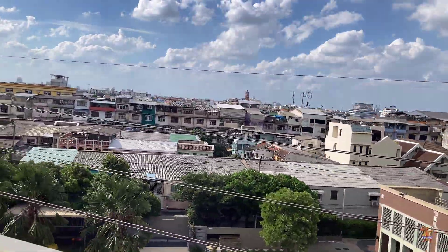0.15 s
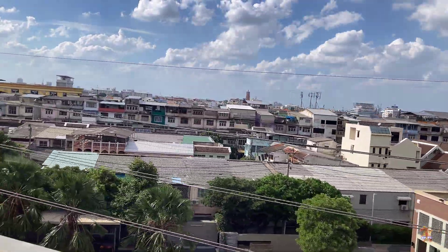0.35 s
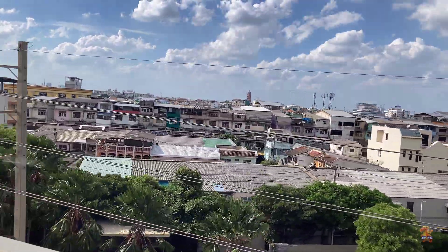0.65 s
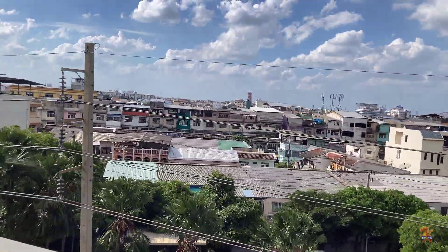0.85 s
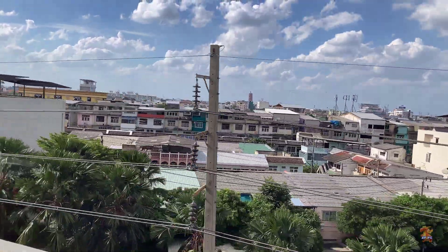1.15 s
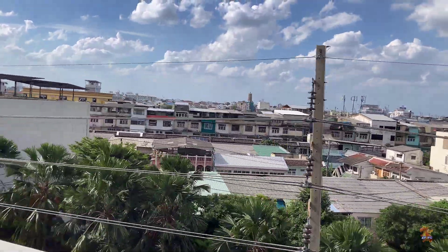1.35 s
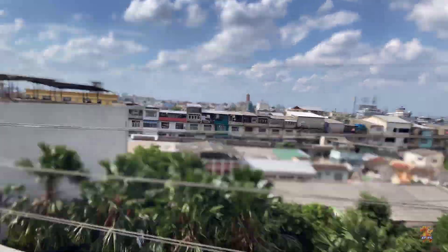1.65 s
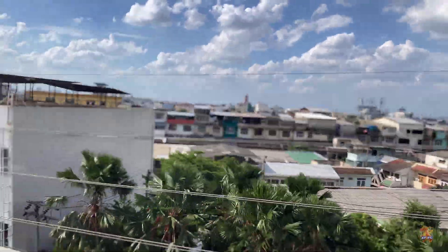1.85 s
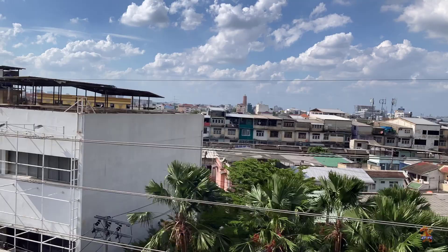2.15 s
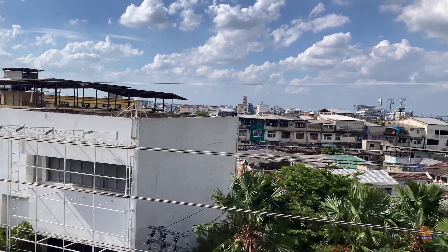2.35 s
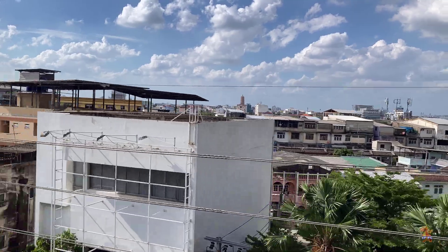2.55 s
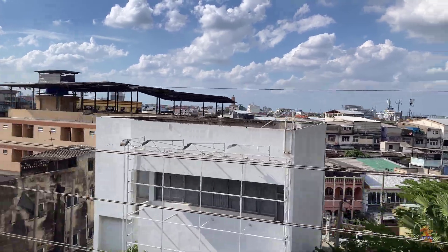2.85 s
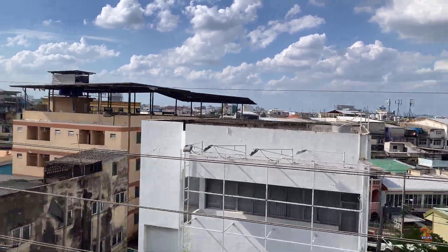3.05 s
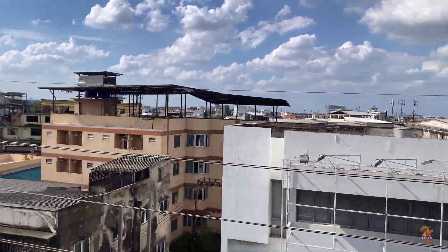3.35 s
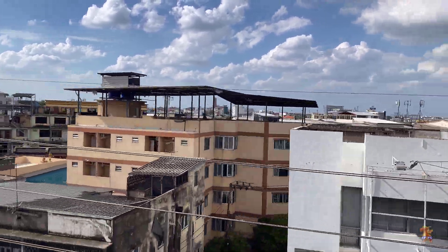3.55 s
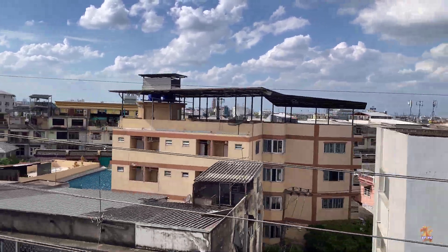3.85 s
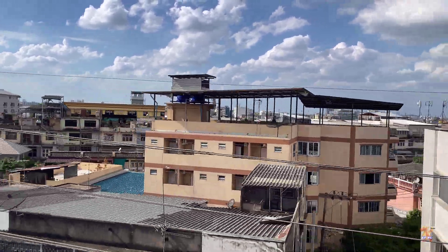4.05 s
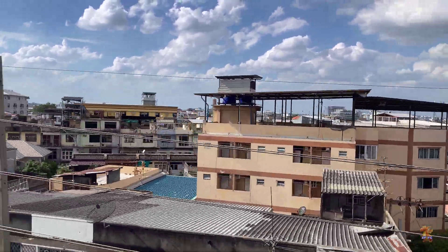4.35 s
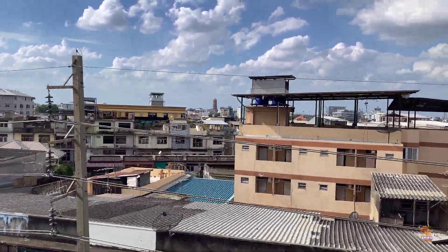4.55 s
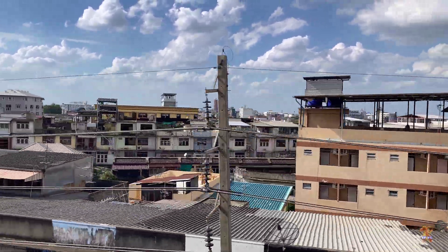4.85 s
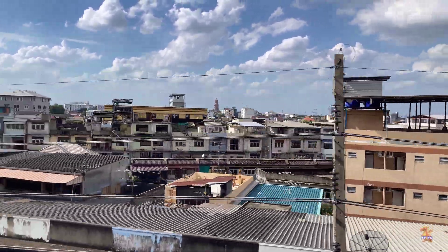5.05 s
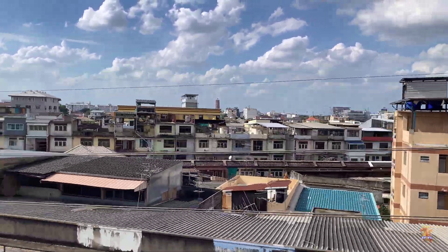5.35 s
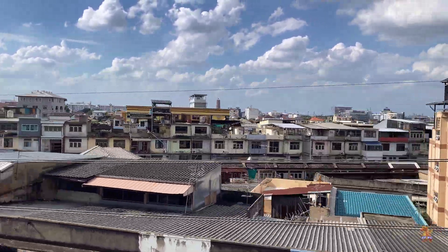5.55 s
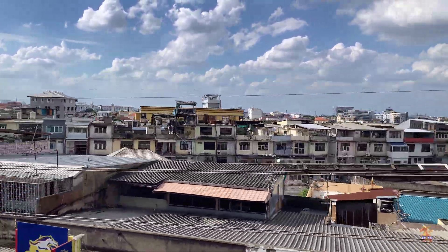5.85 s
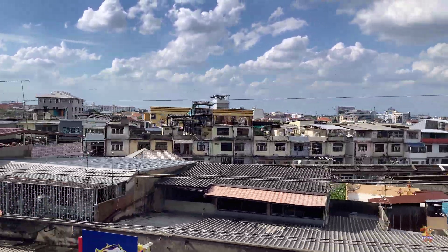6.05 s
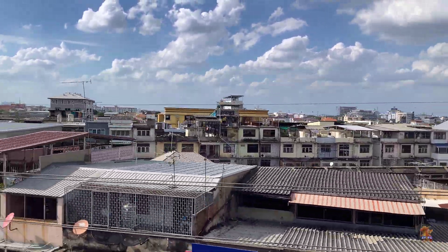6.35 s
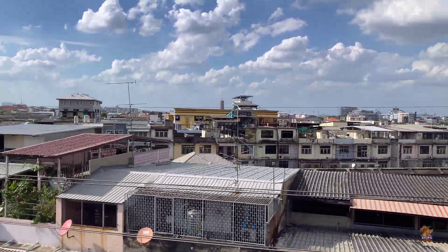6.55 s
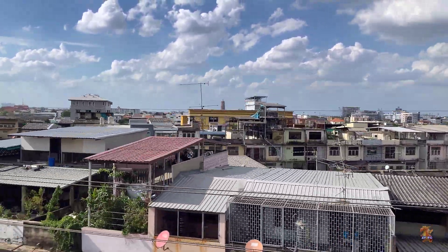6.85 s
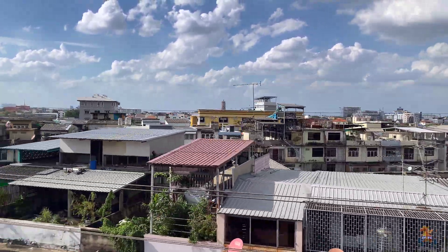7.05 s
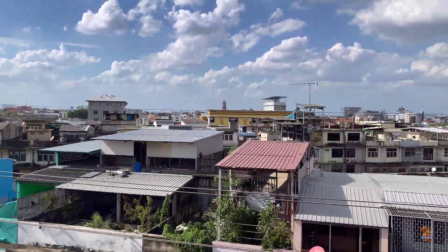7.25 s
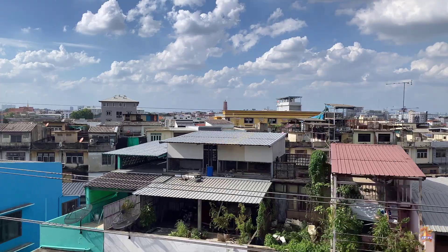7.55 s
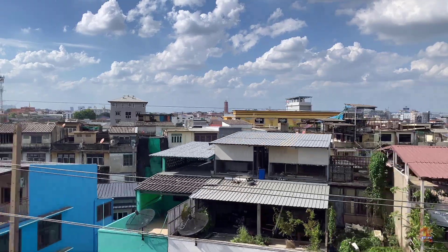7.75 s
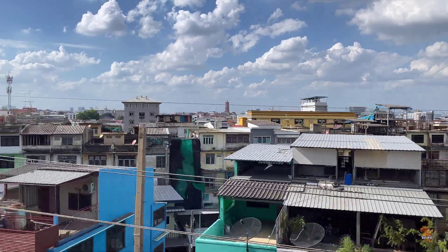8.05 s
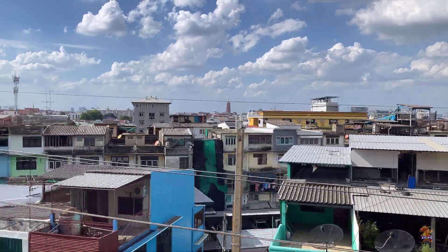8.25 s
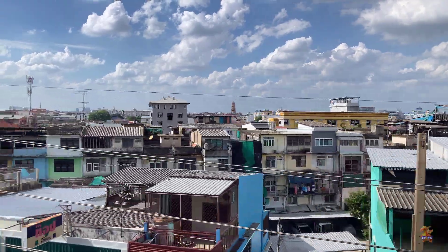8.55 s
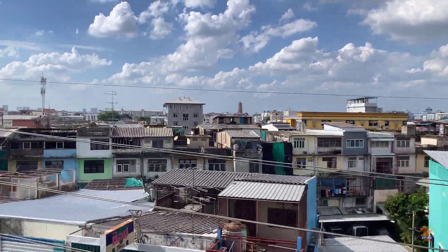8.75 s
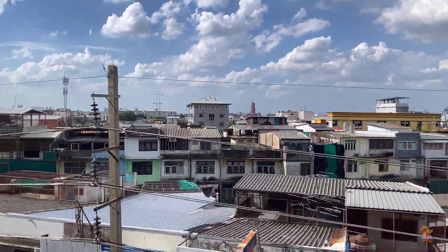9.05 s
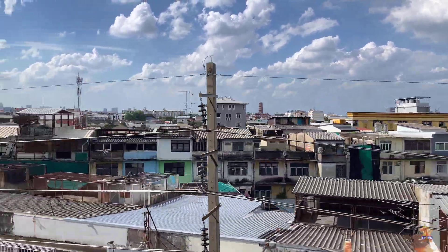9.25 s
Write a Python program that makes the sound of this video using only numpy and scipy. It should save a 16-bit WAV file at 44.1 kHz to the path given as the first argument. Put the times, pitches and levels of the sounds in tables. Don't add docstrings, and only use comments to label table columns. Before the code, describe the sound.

Interior of an elevated train running at steady speed for about 9.4 seconds. A deep, thick floor rumble dominates, strongest in the bass, over a low deck drone and body hum; wheel roar and thin air hiss are much quieter. The level swells and dips gently, with a firmer surge around 6.2-6.7 s and a more hollow drone until about 8.4 s. A steady compressor hum pulses underneath. A faint, slightly wavering gear whine comes in short patches at 0-1.3 s, fades, returns from 3.8 to 5.7 s, and again after 7.9 s; a lower tone joins at 3-4.5 s. Tiny bright panel ticks scatter throughout. At 1.7 s a hand bumps the camera: dull thump, sharp snap, small creaks. Soft body knocks follow around 3.2, 5-5.4, 6.35 and 7.6 s, with tiny squeaks near 3, 7 and 9.3 s. Close stereo microphones, bass centred.

```python
import sys
import numpy as np
from scipy import signal
from scipy.fft import rfft, irfft, next_fast_len
from scipy.io import wavfile
from scipy.ndimage import uniform_filter1d

SR = 44100
rng = np.random.default_rng(int(sys.argv[2]) if len(sys.argv) > 2 else 0)


def wrap_up_sound(samples):
    columns = np.atleast_2d(samples).T
    tamed = np.clip(columns, -1, 1)
    steps = np.round(tamed * 32767).astype(np.int16)
    wavfile.write(sys.argv[1], SR, steps)


def how_loud(loudness_db):
    steps = np.asarray(loudness_db, float) / 20
    return 10 ** steps


N = 414099

# (time [s], level [dB])
RIDE = [(0.0, -17.5), (0.73, -21), (3.3, -18.5), (3.55, -21), (3.9, -19), (6.2, -20.5), (6.22, -15.5),
        (6.75, -20.5), (6.93, -18), (7.19, -20), (7.61, -18), (7.93, -20), (8.11, -19), (8.24, -21),
        (8.89, -19), (9.23, -25), (9.36, -19), (9.39, -30.5)]
# (frequency [Hz], density [dB per Hz])
RUMBLE = [(22, -39), (32, -34), (38, -12), (45, -9), (62, 1.5), (85, -1.5), (100, -6.5), (160, -11),
          (210, -47), (350, -120)]
DRONE = [(50, -100), (90, -11), (120, -0.5), (160, -2.5), (205, -7.5), (240, -17), (300, -29.5),
         (600, -120)]
BODY = [(100, -100), (200, -17), (240, 0), (340, -0.5), (370, -3.5), (410, -8), (480, -9.5), (700, -14),
        (800, -25), (1500, -100)]
ROAR = [(350, -100), (650, -56), (780, 1.5), (950, -2.5), (1050, -1), (1400, -6), (2300, -12), (3200, -46),
        (6000, -110)]
HISS = [(800, -100), (1900, -45), (2500, 1), (4500, -5.5), (6300, -10.5), (7900, -15), (8800, -14),
        (12000, -19.5), (14000, -21.5), (15700, -15.5), (17000, -32)]
RUMBLE_DB, DRONE_DB, BODY_DB, ROAR_DB, HISS_DB = -19.5, -25.5, -31, -41, -49
RUMBLE_SHARE, DRONE_SHARE, BODY_SHARE, ROAR_SHARE = 1.57, 0.92, 0.67, 0.12
# (start [s], length [s], lift [dB])
SPANS = [
    (6.25, 2.14, 2.5),
    (2.5, 0.44, 4),
    (0.25, 0.33, -1),
    (9.6, 0.36, 1),
]
# (time [s], lift [dB])
JOINTS = [
    (0.02, 0.5),
    (1.72, 0.5),
    (3.05, 2),
    (4.73, 1),
    (6.36, 1.5),
    (9.3, 0),
]
JOINT_S = 0.075

# (time [s], level of the fourth order [dB])
COMPRESSOR_LOAD = [(0.0, -33), (0.21, -25.5), (0.68, -26), (0.73, -34), (1.49, -25.5), (1.75, -45),
                   (1.8, -32.5), (4.68, -28), (5.68, -32.5), (5.73, -25), (6.17, -50.5), (6.49, -26.5),
                   (7.29, -33), (7.37, -26.5), (9.26, -34), (9.39, -70)]
# (multiple of the shaft [1], level re the mean fourth order [dB])
HUM_ORDERS = [(1, 3), (3, -3), (6, -8.5), (16, -26.5)]
SHAFT_HZ = 47.95
SAG_S, SAG_DB = 3.3, 4.0

# (time [s], pitch [Hz])
WHINE_HZ = [(0, 832), (.3, 843), (.6, 847), (1.4, 849.5), (2.2, 842), (3.6, 835), (4.6, 839), (5.2, 846),
            (5.8, 850.5), (6.5, 843), (8.2, 838.5), (8.9, 837), (9.39, 847.5)]
# (start [s], length [s], level [dB])
WHINE = [(0.063, 0.24, -47), (0.29, 0.35, -44.5), (0.65, 0.22, -46), (0.945, .14, -46),
         (1.147, 0.15, -48.5), (1.36, .12, -59), (1.848, 0.31, -64), (3.45, 0.2, -67), (3.8, 0.11, -54),
         (3.947, 0.41, -50.5), (4.453, 0.39, -48.5), (4.854, 0.37, -45), (5.296, 0.4, -44),
         (5.745, 0.035, -57), (7.917, 0.15, -57), (8.18, 0.14, -53), (8.4, 0.23, -57), (8.746, 0.3, -50),
         (9.09, .4, -45)]
# (start [s], length [s], level [dB])
WHINE_LOW = [
    (.55, 0.34, -59),
    (3.065, 0.21, -47.5),
    (3.32, 0.09, -51),
    (3.454, .1, -45),
    (3.632, 0.89, -53),
]
# (start [s], length [s], level [dB])
WHINE_HIGH = [
    (-.1, .45, -57),
    (1.4, .31, -51),
    (4.7, .03, -52),
    (5.95, .3, -57),
    (7.94, .08, -51),
    (8.1, .1, -54),
]
# (time [s], share of SLACK [1])
MESH = [(0, 1.1), (1.0, 1.1), (1.2, .6), (5.25, 1.2), (5.4, .3), (5.8, .3), (8.8, 1.1), (9.39, 1.1)]
SLACK = .17
SWELL_S, FADE_S, IDLE_DB = 0.029, 0.057, -58.5

# (time [s], peak level [dB], ring [Hz])
TICKS = [(0.0737, -32, 7300), (0.2748, -32.5, 7260), (0.5477, -40, 7060), (1.3583, -38, 7140),
         (1.6841, -34.5, 7140), (2.2074, -38, 6360), (2.3625, -31.5, 7190), (3.2226, -34.5, 7500),
         (3.8511, -36, 6890), (3.9484, -35.5, 7120), (4.8698, -35.5, 7070), (4.9222, -35, 7220),
         (5.2884, -35, 7550), (5.9609, -42, 7050), (6.1988, -36, 6770), (6.3984, -36, 7190),
         (6.9336, -34, 7000), (7.083, -32, 6800), (7.4656, -33, 6870), (7.7288, -39, 6890),
         (7.9319, -37, 6400), (8.3884, -36, 7010), (8.4257, -38, 7540), (8.5245, -39, 6700),
         (8.6393, -35.5, 7500), (8.7291, -37, 7200), (8.8348, -36, 6800), (8.9275, -33.5, 6570),
         (8.9755, -44, 7080), (9.1491, -40, 7430)]
RING, FAINT_DB, FAINT_SPREAD_DB, PANEL_HZ = 0.26, -51, 5, 6800

# (time [s], length [s], frequency [Hz], width
# [Hz], level [dB])
SQUEAKS = [(2.913, .03, 2560, 200, -50), (3.031, 0.019, 2400, 200, -47), (4.73, 0.097, 3160, 300, -53),
           (5.85, .12, 9000, 500, -61), (6.954, .05, 3000, 250, -46.5), (9.292, 0.035, 2100, 120, -43),
           (9.298, 0.03, 2860, 230, -49), (9.318, 0.05, 2560, 100, -52), (9.355, 0.035, 2000, 120, -44),
           (9.265, 0.024, 1080, 100, -45), (1.715, .012, 6500, 6000, -46), (1.755, .07, 9500, 6000, -60),
           (1.75, .08, 13500, 2500, -64), (8.965, .03, 11000, 8000, -60), (9.14, .025, 11000, 8000, -61),
           (6.62, .05, 510, 40, -40.5), (7.58, .05, 430, 40, -36), (8.98, .025, 1250, 120, -41),
           (9.06, .025, 1120, 120, -43)]
# (time [s], peak level [dB], frequency [Hz], time to -60 dB [s])
BUMP = [
    (1.7165, -27, 520, .02),
    (1.7212, 11, 200, .008),
    (1.7245, -22, 290, .06),
    (1.724, -4, 76, .09),
    (1.7348, -34, 2750, .014),
]
# (time [s], peak level [dB])
CREAKS = [
    (1.723, -29),
    (1.7347, -15.5),
    (1.762, -35),
    (1.775, -38),
    (1.7865, -36),
    (1.798, -32),
    (8.976, -31),
    (9.149, -33),
]
# (frequency [Hz], width [Hz], gain [dB])
CASE = [(2700, 1200, 0), (4800, 3000, -8), (7200, 2500, -9), (9000, 2000, -3), (11200, 2600, 8),
        (13500, 2500, 5), (14900, 1500, 1)]
# (time [s], peak level [dB], frequency [Hz], time to -60 dB [s])
KNOCKS = [(2.16, -31, 853, .1), (2.52, -31, 890, .08), (3.032, -31, 826, 0.12), (3.03, -26, 920, 0.16),
          (3.219, -18, 336.5, 0.18), (5.0, -19, 230, 0.12), (5.329, -18, 290, .08),
          (5.449, -20, 305, 0.071), (6.35, -19, 251, 0.12), (4.1, -28.5, 538, 0.15), (5.115, 2, 200, 0.01),
          (6.3, -47, 450, 0.18), (6.817, -26, 555, 0.045), (7.589, -15, 130, 0.046),
          (7.59, -26, 620, 0.027)]

# (frequency [Hz], likeness [0-1, clipped])
SAME = [(60, .975), (220, .985), (330, 0.67), (600, 0), (900, 0.48), (1800, 0.25), (2400, -0.4),
        (6200, 0.27), (7000, 0.8), (8500, 0.9), (10000, 4), (16000, 9)]
# (frequency [Hz], lead of the right [rad])
LEAD = [(0, -.15), (400, -.45), (850, -2.0), (1050, -3.3), (2000, -4.0), (3200, -9.0), (5600, -15.0),
        (7000, -12.57), (15900, 0.0)]
# (frequency [Hz], left over right [dB])
TILT = [(40, -1.7), (90, -1.6), (170, -.7), (350, -.9), (600, 3.2), (1100, 1.9), (2400, .8), (6000, .4),
        (10000, 0)]


def evened(x):
    return x / np.sqrt(np.mean(x ** 2) + 1e-20)


def read(points, hz):
    f, value = np.transpose(points)
    return np.interp(np.log(hz + 1), np.log(f + 1), value)


def curves(rows):
    s, *columns = np.transpose(rows)
    return [np.interp(np.arange(N) / SR, s, c) for c in columns]


def drift(rate_hz):
    knots = rng.standard_normal(400)
    return np.interp(np.arange(N) / SR * rate_hz, np.arange(400), knots)


def add(mix, s, sound):
    part = mix[round(s * SR):][:len(sound)]
    part += sound[:len(part)]


def resonate(x, hz, width):
    turn = np.exp(2j * np.pi * np.cumsum(hz * np.ones(len(x))) / SR)
    r = np.exp(-np.pi * width / SR)
    smooth = signal.lfilter([1 - r], [1, -r], x / turn + 1e-18)
    return 2 * (turn * smooth).real


def wash(shape, size, patchy_db, flicker_db, steady=0):
    frames, hz = N * 2 // size + 3, np.fft.rfftfreq(size, 1 / SR)
    a, b, c, d, patches = rng.standard_normal((frames, len(hz), 5)).T
    patches = evened(uniform_filter1d(uniform_filter1d(patches, 10, 0), 5, 1))
    flicker = evened(uniform_filter1d(rng.standard_normal(frames), 3))
    z = np.array([a + 1j * b, c + 1j * d])
    power = uniform_filter1d(abs(z) ** 2 / 2, size=6, axis=1)
    z /= uniform_filter1d(power, size=3, axis=2) ** steady
    z *= how_loud(read(shape, hz)[:, None] + patchy_db * patches + flicker_db * flicker)
    return evened(signal.istft(z, window="cosine", nperseg=size)[1][:, :N])


def carriage():
    ride_db, = curves(RIDE)
    ride_db = ride_db - ride_db.mean()
    t = np.arange(N) / SR
    span_db = sum(db * np.clip(np.minimum(t - s, s + length - t) / 0.035, 0, 1) for s, length, db in SPANS)
    joint_db = sum(db * np.exp(-((t - s) / JOINT_S) ** 2) for s, db in JOINTS)

    rumble = wash(RUMBLE, size=8192, patchy_db=1.0, flicker_db=1.2, steady=0.55)
    rumble *= how_loud(RUMBLE_DB + RUMBLE_SHARE * ride_db - 0.84 * span_db)
    drone = wash(DRONE, size=4096, patchy_db=0.72, flicker_db=-0.07, steady=0.29)
    drone *= how_loud(DRONE_DB + DRONE_SHARE * ride_db + span_db)
    body = wash(BODY, size=4096, patchy_db=1.3, flicker_db=-0.93)
    body *= how_loud(BODY_DB + BODY_SHARE * ride_db + joint_db)
    roar = wash(ROAR, size=2048, patchy_db=1.22, flicker_db=0.66, steady=0.08)
    roar *= how_loud(ROAR_DB + ROAR_SHARE * ride_db + 1.5 * joint_db)
    hiss = wash(HISS, size=1024, patchy_db=1.5, flicker_db=.5)
    hiss *= how_loud(HISS_DB + 0.5 * joint_db)
    return rumble + drone + body + roar + hiss


def compressor():
    load_db, = curves(COMPRESSOR_LOAD)
    t = np.arange(N) / SR
    turns = t * SHAFT_HZ
    out = how_loud(load_db + 3.0 * drift(10.0)) * np.cos(2 * np.pi * 4 * turns)
    for order, db in HUM_ORDERS:
        sag_db = SAG_DB * (order > 5) * np.clip(t - SAG_S, 0, 1)
        order_db = load_db.mean() + db + 2.0 * drift(4.6) - sag_db
        out += how_loud(order_db) * np.cos(2 * np.pi * (round(order) * turns + rng.random()))
    return np.sqrt(2) * out


def load_patches(rows):
    t = np.arange(0, N, 64) / SR
    gain = np.zeros(len(t))
    for s, length, db in rows:
        edge = np.minimum((t - s) / SWELL_S, (s + length - t) / FADE_S)
        gain += how_loud(db) * np.clip(edge + 1, 0, 1) ** 2
    return np.interp(np.arange(N) / SR, t, gain)


def whine(hz, rows, wobble, trim_db):
    turns = np.cumsum(hz * np.ones(N)) / SR + wobble * drift(38)
    flutter_db = 1.8 * drift(21) - 1.0 * drift(30) ** 2
    gain = (load_patches(rows) + how_loud(IDLE_DB)) * how_loud(flutter_db + trim_db)
    return gain * np.sqrt(2) * np.cos(2 * np.pi * turns)


def ticks():
    out, t = np.zeros(N), np.arange(1500) / SR
    when, size, pitch = rng.random((13, 3)).T
    faint_db = FAINT_DB + FAINT_SPREAD_DB * (size - .5)
    rows = TICKS + list(zip(when * N / SR, faint_db, PANEL_HZ * (.96 + .08 * pitch)))
    bright = signal.butter(2, [3500, 11500], "band", fs=SR, output="sos")
    puffs = signal.sosfilt(bright, rng.standard_normal((len(rows), 1500)))
    rise = np.minimum(t / .0015, 1)
    for (s, db, hz), puff in zip(rows, puffs):
        panel = np.sin(2 * np.pi * hz * t) * how_loud(-60 * t / .03)
        burst = (1 - RING) * 0.95 * puff * how_loud(-60 * t / 0.053) + RING * panel
        add(out, s, how_loud(db - 2.5) * rise * burst)
    return out


def squeaks():
    out = np.zeros(N)
    for s, length, hz, width, db in SQUEAKS:
        rub = resonate(rng.standard_normal(round(length * SR)), hz, width)
        add(out, s, how_loud(db) * evened(rub) * signal.windows.tukey(len(rub), .4))
    return out


def blows(rows):
    out, t = np.zeros(N), np.arange(8000) / SR
    for s, db, hz, t60 in rows:
        rise = np.minimum(t * hz / .45, 1)
        add(out, s, how_loud(db - 60 * t / t60) * -np.sin(2 * np.pi * hz * t) * rise)
    return out


def creaks():
    out, t = np.zeros(N), np.arange(600) / SR
    snaps = np.arange(600) % 37 == 20
    for s, db in CREAKS:
        grit = rng.standard_normal(600)
        slip = (.3 * grit + 6 * snaps) * how_loud(-60 * t / .003) * np.minimum(t / .0005, 1)
        sound = sum(how_loud(g_db) * resonate(resonate(slip, hz, width), hz, width) for hz, width, g_db in CASE)
        add(out, s, how_loud(db + 2.5) * sound / abs(sound).max())
    return out


def scene():
    size = next_fast_len(N)
    hz = np.fft.rfftfreq(size, 1 / SR)
    field, other = rfft(carriage(), size)
    near = compressor()
    near += whine(*curves(WHINE_HZ), WHINE, wobble=SLACK * curves(MESH)[0], trim_db=6.0)
    near += ticks() + squeaks() + blows(BUMP) + creaks() + blows(KNOCKS)
    located = rfft(near, size)

    low = whine(621, WHINE_LOW, wobble=.08, trim_db=0) * how_loud([[5.5], [-5]])
    high = whine(1025, WHINE_HIGH, wobble=.1, trim_db=0)
    high = np.array([how_loud(-3.0) * np.roll(high, 12), how_loud(3.5) * high])

    same = np.clip(read(SAME, hz), 0, .99)
    lead = np.exp(1j * np.interp(hz, *np.transpose(LEAD)))
    tilt = how_loud(read(TILT, hz) / 2)
    left = located + field
    right = lead * (located + same * field) + np.sqrt(1 - same ** 2) * other
    return irfft(np.array([left * tilt, right / tilt]), size)[:, :N] + low + high


def top_cut(x):
    return signal.sosfilt(signal.butter(12, 15750, fs=SR, output="sos"), x)


def record(dry):
    power = abs(uniform_filter1d((dry ** 2).mean(0), 900))
    over_db = np.maximum(10 * np.log10(power + 1e-12) + 22.0, 0)
    cut_db = 0.097 * uniform_filter1d(over_db, 601)
    return top_cut(dry / how_loud(cut_db))


dry = scene()
out = record(dry)
wrap_up_sound(out)
```